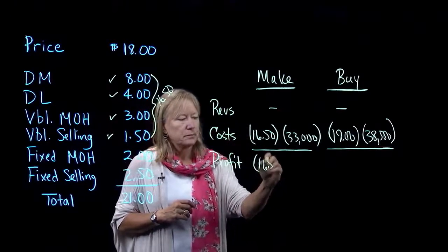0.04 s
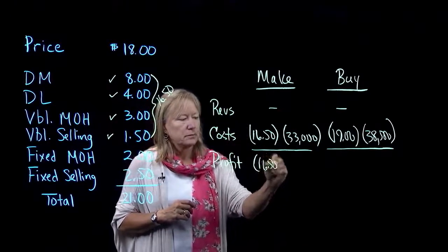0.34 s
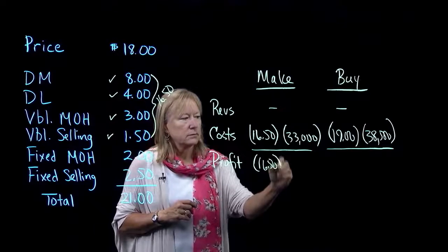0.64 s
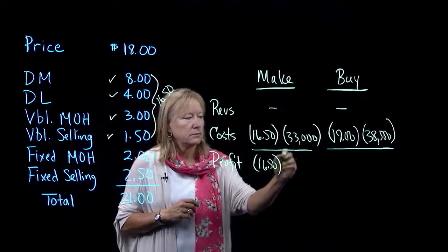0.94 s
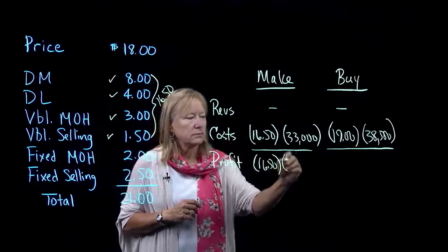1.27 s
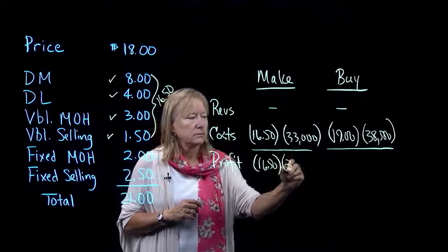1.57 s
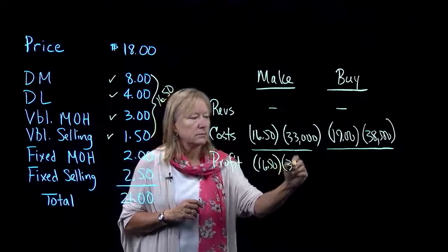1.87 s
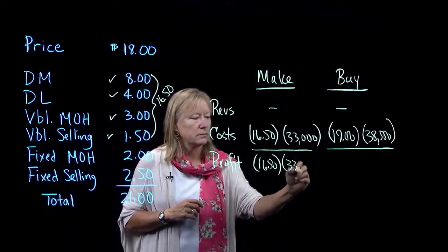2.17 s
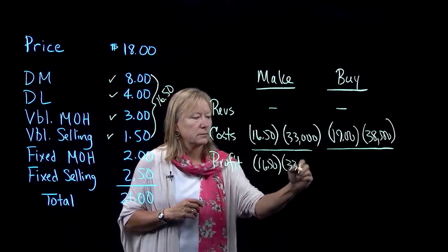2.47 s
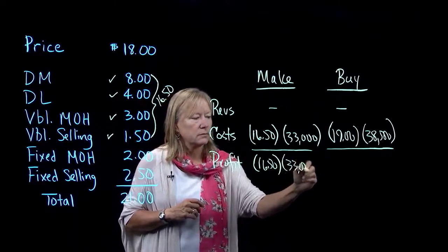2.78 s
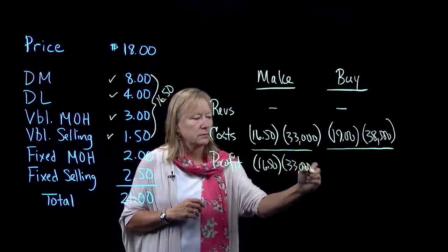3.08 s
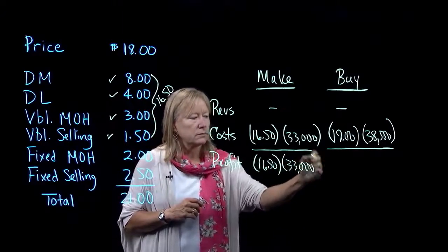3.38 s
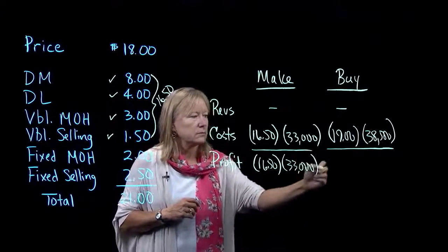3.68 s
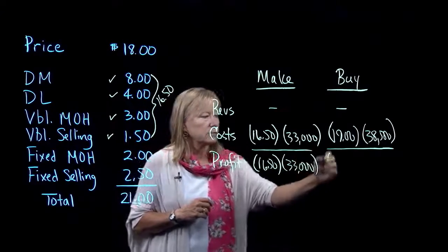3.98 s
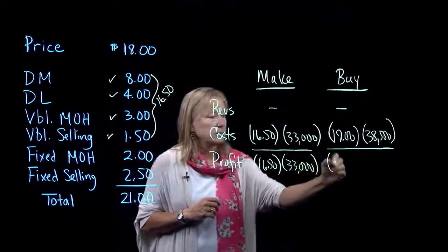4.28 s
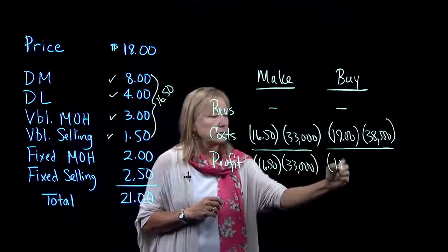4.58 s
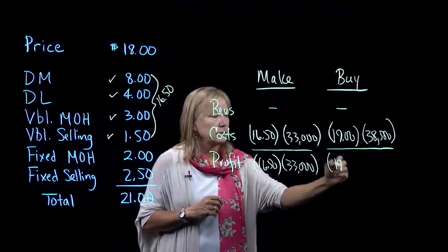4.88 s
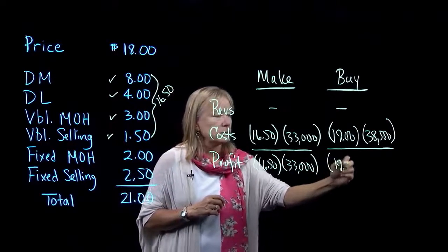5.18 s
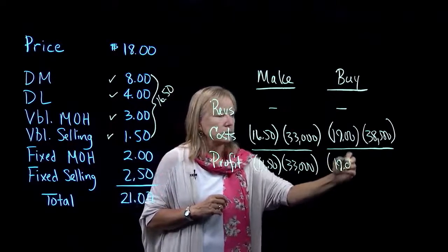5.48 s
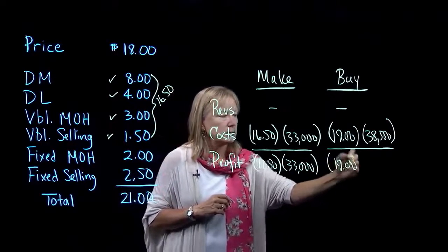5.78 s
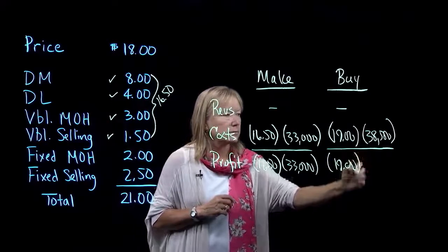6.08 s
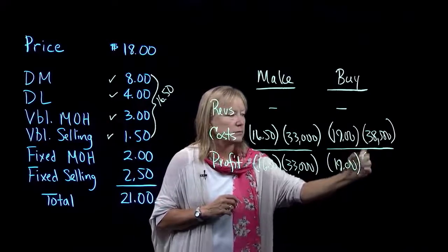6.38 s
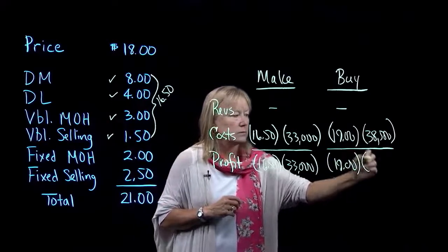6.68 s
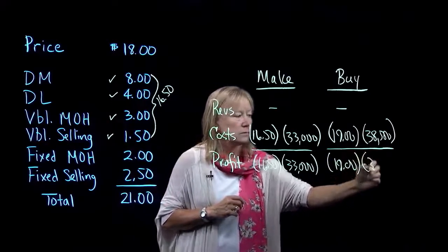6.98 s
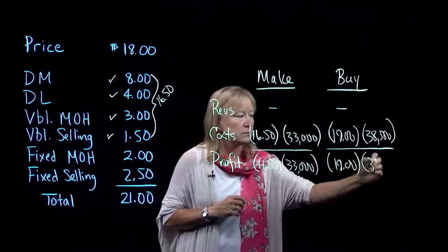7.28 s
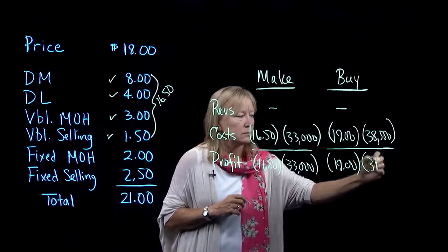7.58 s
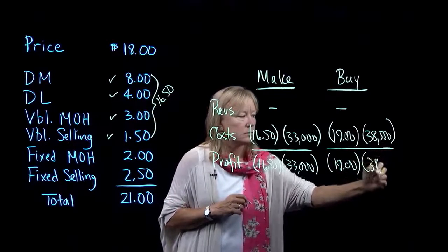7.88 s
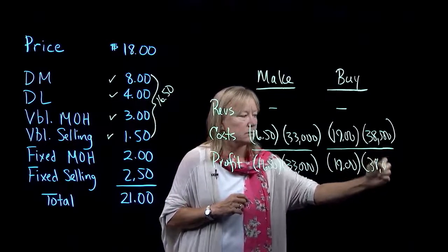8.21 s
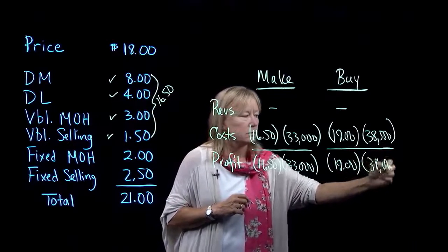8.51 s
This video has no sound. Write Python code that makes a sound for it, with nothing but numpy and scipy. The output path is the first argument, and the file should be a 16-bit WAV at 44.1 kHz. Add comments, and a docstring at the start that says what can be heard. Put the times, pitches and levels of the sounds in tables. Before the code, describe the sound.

Close to the microphone, a marker taps against a glass pane in an irregular writing rhythm. The short knocks ring slightly, firmest about two seconds in and mostly lighter toward the end, with small plastic ticks and barely audible brushes of sleeve and felt. The indoor space has very little echo, and a soft, low rumble and hum of ventilation fills the gaps.

```python
"""A quiet, dry studio, where a felt marker writes figures from left to right on a large glass board.
Each touch-down is an impact: it knocks the pane, whose bending modes ring briefly, and rocks the stand.
The strokes between are almost silent, with only light ticks of the pen and brushes of sleeve and felt.
Ventilation rumbles and hums in its duct resonances under a faint microphone hiss."""
import sys
import numpy as np
from scipy import signal
from scipy.fft import rfft, irfft, next_fast_len
from scipy.io import wavfile
from scipy.ndimage import map_coordinates

SR = 44100
rng = np.random.default_rng(int(sys.argv[2]) if len(sys.argv) > 2 else 0)


def pcm_store(signal):
    """Save signal as 16-bit PCM."""
    levels = np.round(np.clip(np.atleast_2d(signal), -1, 1) * 32767)
    wavfile.write(sys.argv[1], SR, levels.astype(np.int16).T)


N = 381465
RING = 2 ** 15  # samples in one impulse response

# touch-downs: t/s, place along the line/m, force/dB, hardness/dB, click of the tip in its holder/dB
TOUCHES = [(0.1454, .008, 1.56, 0.5, 4), (.58, 0.012, 3.5, -2, 1.5), (1.0018, 0.079, 0.5, 1.6, -5),
           (1.2913, 0.1, 3.5, 0, 2.5), (1.7846, 0.13, 9.5, -3, -0.5), (2.2436, 0.11, 2.54, -2, -5),
           (2.4377, .12, 5, 1.5, -2), (3.4032, 0.15, 4, 0, -1), (3.9806, 0.25, -1, -7, -1),
           (4.276, .3, -0.2, 6.5, 1), (4.5354, 0.29, 3, 3.7, 1.5), (5.0735, 0.27, 1.1, -2.8, 2),
           (5.2404, 0.26, -1, 2.5, 0), (5.98, 0.41, 0.35, 0.8, -6), (6.367, 0.41, -4.5, -0.3, -3),
           (6.6848, 0.37, -4.5, 2, -1), (7.2264, 0.43, 4.5, 0.5, 1.5), (7.8428, 0.44, -2, -3.5, 1),
           (8.074, 0.45, -9.2, 1.2, 1)]
# contact spectrum: f/Hz, level of an average touch/dB, slope with force/(dB/dB), with hardness/(dB/dB)
CONTACT_SPECTRUM = [(100, 0, -0.43, 0.14), (320, -0.64, -.3, -0.16), (722, -1.12, 0.14, 0.14),
                    (1730, -1.5, 0.93, 1.1), (3230, 2, 1.21, 1.22), (7000, -11.5, 0.77, 0.6)]
# first bending wave, straight from the tip: f/Hz, level/dB
KNOCK_SPECTRUM = [(40, -36.5), (150, -3.5), (300, 1.5), (500, -1), (680, 0), (800, 7), (980, -4),
                  (1200, -20), (1900, -24), (3000, -42), (4500, -44), (8000, -39), (15000, -58)]
# waves scattered back by the edges and the frame: f/Hz, level/dB
SCATTER_SPECTRUM = [(60, -23.5), (200, -9.5), (450, -8), (750, 2), (1000, -9), (1300, -10), (1750, -12.5),
                    (2300, -24.5), (3200, -34.5), (4400, -40), (5500, -37), (7000, -40.5), (15000, -43)]
# decay of the scattered waves: f/Hz, T60/s
SCATTER_DECAY = [(200, 0.31), (700, 0.05), (1500, 0.039), (3000, 0.086), (6000, 0.041), (14000, .025)]
# bending modes of the pane: f/Hz, T60/s, level/dB, spacing of nodal lines/m, place of one nodal line/m
PANE_MODES = [(178, 0.3, -50, 0.9, 1.7), (249, 0.12, -51.5, 0.9, 0.945), (288, 0.12, -47.1, 0.867, 1.04),
              (316, 0.26, -46.1, 0.367, 0.33), (353, 0.12, -51.6, 0.74, 1.313),
              (399, 0.12, -49.8, 0.454, 0.602), (424, 0.23, -58.9, 0.9, 1.485),
              (497, 0.12, -49.9, 0.302, 0.234), (581, 0.3, -53.6, 0.403, 0.766),
              (626, 0.12, -56.3, 0.232, 0.156), (681, 0.12, -51.0, 0.9, 0.742),
              (712, 0.12, -46.8, 0.212, 0.339), (742, 0.12, -44.0, 0.9, 0.112),
              (810, 0.12, -47.5, 0.741, 1.279), (886, 0.12, -53.9, 0.195, 0.22),
              (944, 0.12, -48.2, 0.156, 0.278), (1089, 0.17, -49.7, 0.255, 0.255),
              (1157, 0.12, -57.6, 0.282, 0.191), (1239, 0.12, -50.9, 0.309, 0.139),
              (1301, 0.12, -56.8, 0.9, 1.17), (1473, 0.12, -63.0, 0.128, 0.16),
              (1588, 0.11, -50.1, 0.14, 0.031), (1766, 0.08, -50.1, 0.352, 0.493),
              (1953, 0.1, -60.7, 0.244, 0.03), (2061, 0.06, -64.9, 0.102, 0.025),
              (2337, 0.08, -62.8, 0.159, 0.139), (2574, 0.08, -70.3, 0.091, 0.133),
              (2916, 0.065, -71.9, 0.127, 0.038), (3090, 0.065, -71.8, 0.321, 0.032),
              (3867, 0.08, -76.7, 0.057, 0.01)]
# rocking modes of the board on its stand: f/Hz, T60/s, level/dB
STAND_MODES = [(55.4, 1, -54.5), (78.3, 0.83, -53), (115.8, 0.29, -53), (143.9, 0.55, -55)]
# ticks of the pen in the hand: t/s, level/dB, f/Hz, bandwidth/Hz, decay time/s
PEN_TICKS = [(0.0273, -36.5, 1700, 1700, 0.0015), (0.4196, -24.5, 2110, 1040, 0.0032),
             (.4205, -15.5, 770, 230, 0.013), (7.488, -43, 6960, 4000, .0012),
             (7.545, -43, 3520, 3000, 0.0018)]
# brushes of the sleeve and rubs of the felt: t/s, half-width/s, level/dB
RUBS = [(3.706, 0.0077, -74.5), (3.735, 0.067, -79), (7.422, .09, -84.5), (7.623, .06, -85.5)]
# friction noise of cloth and felt: f/Hz, level/dB
RUB_SPECTRUM = [(300, -12), (1000, 16.5), (3000, 7.5), (5500, -1), (9000, -5), (15000, -19)]
# ventilation rumble and microphone hiss: f/Hz, level/dB
AIR_SPECTRUM = [(8, -22.5), (17, -14.5), (33, -25.5), (62, -35.5), (100, -39.5), (200, -45.5), (280, -46.5),
                (350, -53.5), (600, -61.5), (1200, -68.5), (3000, -76.5), (6000, -80), (15000, -82)]
# fan and duct resonances: f/Hz, bandwidth/Hz, level/dB
DUCT_MODES = [(64.3, 6.6, -63.5), (78.6, 3.4, -64.5), (115.25, 4.1, -67), (146, 23, -65.5),
              (188.13, 4.2, -63), (206.7, 5.1, -68)]


def marker(knock_db=0.24, scatter_db=-1.54):
    """Impact: direct wave, scattered waves and modes superpose, all filtered by the contact."""
    out, wobble = np.zeros(N), stand_wobble()
    knock = -colour(signal.unit_impulse(RING), KNOCK_SPECTRUM)  # the pane recedes: pressure drops first
    for start, place, force_db, hardness_db, click_db in TOUCHES:
        scatter = colour(diffuse(SCATTER_DECAY, build_s=0.00058), SCATTER_SPECTRUM)
        blow = undb(knock_db) * knock + undb(scatter_db) * scatter + pane_ring(place) + wobble
        add(out, start, undb(force_db) * colour(blow, contact(force_db, hardness_db, click_db)))
    return out


def contact(force_db, hardness_db, click_db, click_above_hz=5000):
    """Nonlinear contact: felt stiffens under load, so a firm or hard touch is shorter and brighter."""
    return [(hz, db + per_force * force_db + per_hardness * hardness_db + click_db * (hz > click_above_hz))
            for hz, db, per_force, per_hardness in CONTACT_SPECTRUM]


def pane_ring(place, ring_db=0.44, travelling=0.25, build_s=0.0011):
    """Standing waves: a mode is driven strongly between its nodal lines and weakly on them."""
    t, out = np.arange(RING) / SR, 0
    for hz, t60, db, spacing, node in PANE_MODES:
        angle = np.pi * (place - node) / spacing
        shape = np.sin(angle) + 1j * travelling * np.cos(angle)  # the frame absorbs: part travels on
        oscillation = np.exp((2j * np.pi * hz - np.log(1000) / t60) * t)
        out = out + undb(db + ring_db) * np.imag(shape * oscillation)
    return out * (1 - np.exp(-t / build_s))


def stand_wobble(build_s=0.0022):
    """Damped oscillation: the heavy board takes a moment to start rocking and outlasts the ring."""
    t = np.arange(RING) / SR
    modes = sum(undb(db) * np.exp(-np.log(1000) * t / t60) * np.sin(2 * np.pi * hz * t)
                for hz, t60, db in STAND_MODES)
    return modes * (1 - np.exp(-t / build_s))


def pen_ticks():
    """Damped resonance: each tiny tick of the plastic pen is a noise band that decays exponentially."""
    out, t = np.zeros(N), np.arange(RING) / SR
    for start, db, hz, width, decay in PEN_TICKS:
        tick = band_noise(hz, width, RING) * np.exp(-t / decay)
        add(out, start, undb(db) * tick / abs(rfft(tick)).max())
    return out


def rubbing():
    """Sliding friction: sleeve and felt give soft, bell-shaped swells of broadband noise."""
    t = np.arange(N) / SR
    friction = colour(rng.standard_normal(N), RUB_SPECTRUM)
    return friction * sum(undb(db) * np.exp(-((t - peak) / width) ** 2) for peak, width, db in RUBS)


def studio(x, room_db=-18):
    """Reverberation: absorbent walls return only a weak, short diffuse field."""
    decay = [(150, 0.88), (600, 0.27), (1200, 0.38), (2000, 0.24), (4000, 0.36), (12000, 0.15)]
    walls = diffuse(decay, build_s=0.0011)
    return x + undb(room_db) * signal.fftconvolve(x, walls)[:N]


def ventilation(hum_db=0.43, fade_db_per_s=0.29, waver_db=1.5):
    """Noise-driven resonance: fan and ducts hum, wavering and easing off, over steady rumble and hiss."""
    air = colour(rng.standard_normal(N), AIR_SPECTRUM)
    hum = sum(undb(db) * band_noise(hz, width, N) for hz, width, db in DUCT_MODES)
    level_db = hum_db - fade_db_per_s * np.arange(N) / SR + waver_db * waver(points_per_s=4.5)
    return air + hum * undb(level_db)


def waver(points_per_s):
    """Random modulation: a smooth curve through random points, with unit standard deviation."""
    curve = map_coordinates(rng.standard_normal(256), [np.arange(N) / SR * points_per_s], mode="mirror")
    return (curve - curve.mean()) / curve.std()


def diffuse(t60_points, build_s):
    """Diffuse field: dense reflections build up, then each band decays as given by (f/Hz, T60/s)."""
    t, f = np.arange(RING) / SR, bins(RING)
    noise, out = rfft(rng.standard_normal(RING)), 0
    rise = 1 - np.exp(-t / build_s)
    for hz in 62.5 * 2 ** (np.arange(25) / 3):  # third-octave bands
        window = np.cos(np.pi / 2 * np.clip(3 * np.log2((f + 1) / hz), -1, 1)) ** 2
        decay = np.exp(-np.log(1000) * t / along(t60_points, hz))
        band = irfft(noise * window) * rise * decay
        out = out + band * np.sqrt(window.mean() / np.sum(band ** 2))  # equal energy per hertz
    return out


def band_noise(hz, width, size):
    """Resonant filtering: white noise confined to one steep band, with unit rms."""
    f = bins(size) + 1
    detuning = (f * f - hz * hz) / (f * width)
    x = irfft(rfft(rng.standard_normal(size)) / (1 + detuning ** 2), size)
    return x / x.std()


def colour(x, points):
    """Minimum-phase filtering: folding the cepstrum makes the (f/Hz, level/dB) response causal."""
    size = 2 * next_fast_len(len(x))
    cepstrum = irfft(np.log(undb(along(points, bins(size)))))
    cepstrum[1:size // 2] *= 2
    cepstrum[size // 2 + 1:] = 0
    return irfft(rfft(x, size) * np.exp(rfft(cepstrum)))[:len(x)]


def along(points, hz):
    """Interpolation of (f/Hz, value) points on a logarithmic frequency axis."""
    f, value = np.transpose(points)
    return np.interp(np.log(hz + 1), np.log(f), value)


def bins(size):
    """Fourier frequencies of a signal of this many samples."""
    return np.arange(size // 2 + 1) * SR / size


def undb(db):
    """Amplitude ratio of a level in decibels."""
    return 10 ** (np.asarray(db) / 20)


def add(track, start_s, sound):
    """Superposition of a delayed sound on the track."""
    i = max(int(start_s * SR), 0)
    track[i:i + len(sound)] += sound[:N - i]


def scene():
    """Superposition: writing, its reverberation and the background sum at one close microphone."""
    writing = marker() + pen_ticks() + rubbing()
    return (studio(writing) + ventilation())[None]


def record(dry, cutoff_hz=15500):
    """Band limiting: a steep low-pass filter removes the highest treble."""
    return signal.sosfilt(signal.ellip(10, .1, 70, cutoff_hz, fs=SR, output="sos"), dry)


dry = scene()
out = record(dry)
pcm_store(out)
```